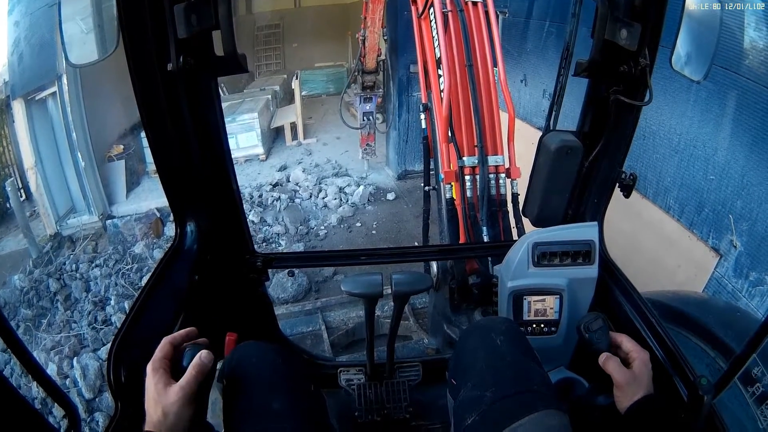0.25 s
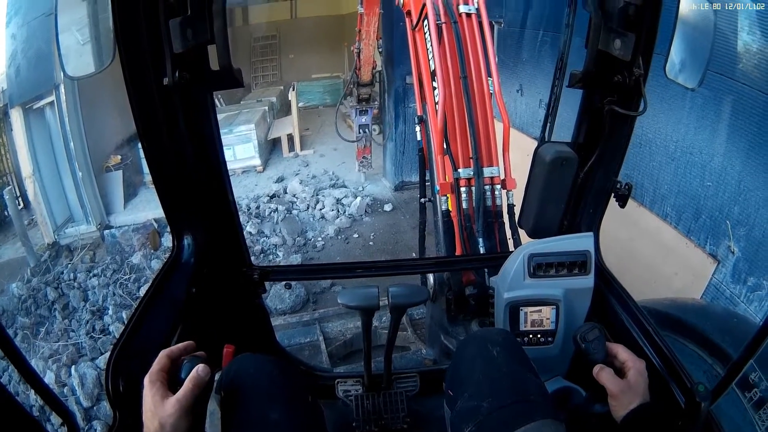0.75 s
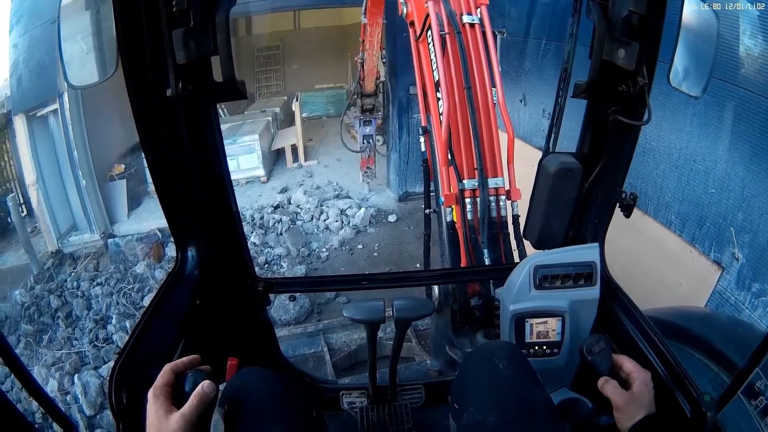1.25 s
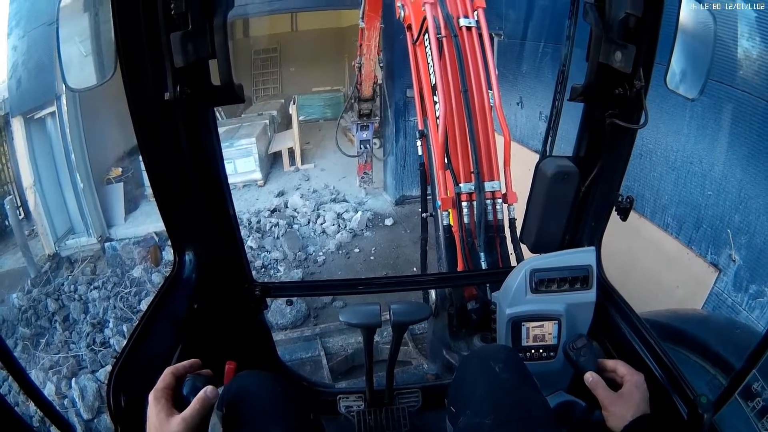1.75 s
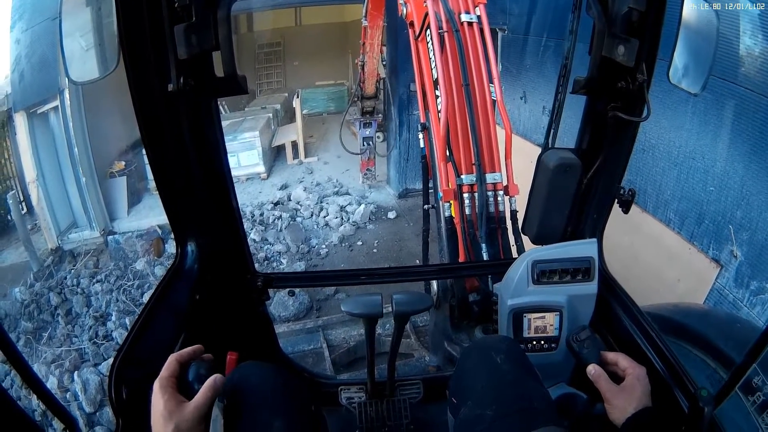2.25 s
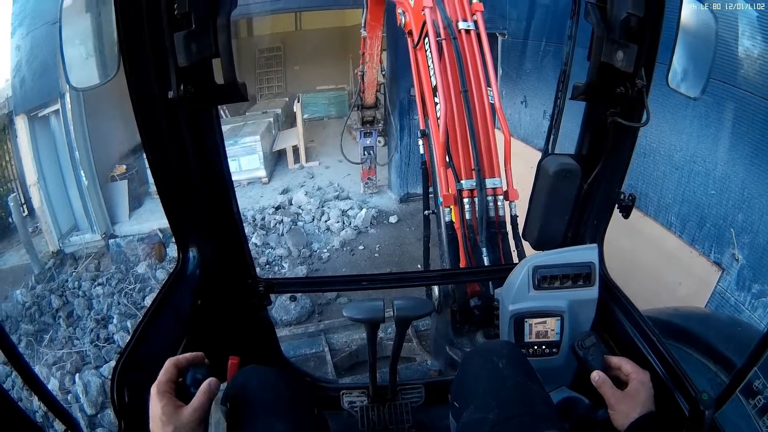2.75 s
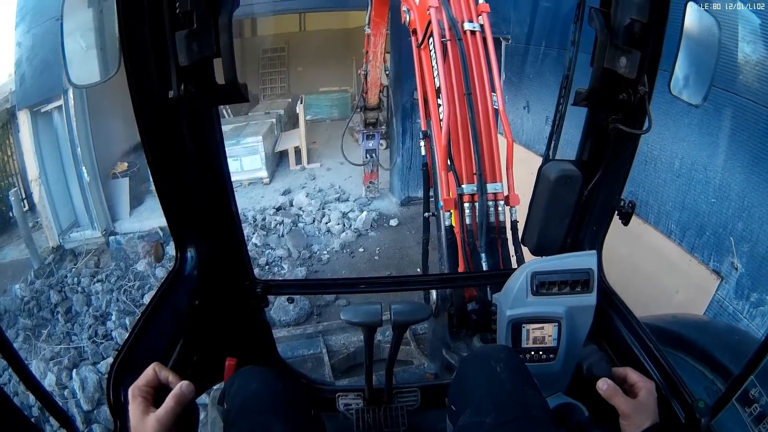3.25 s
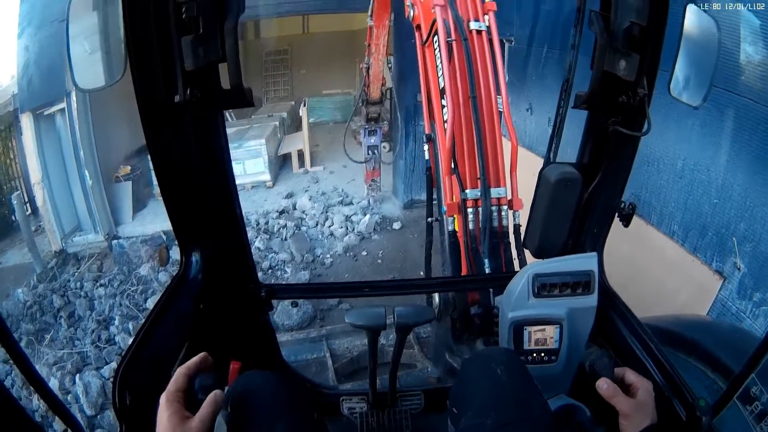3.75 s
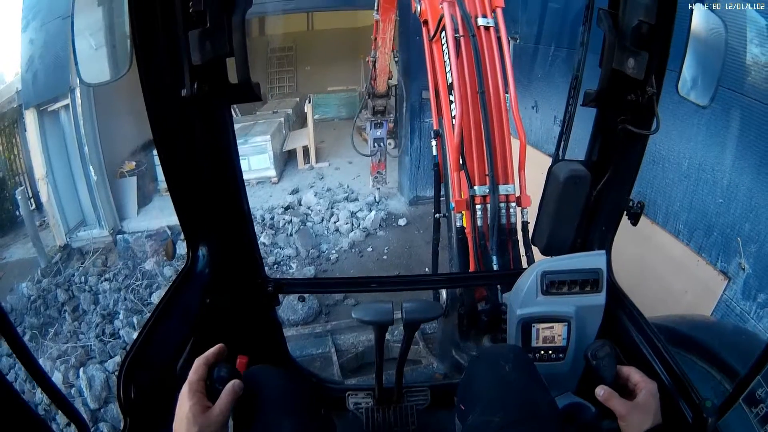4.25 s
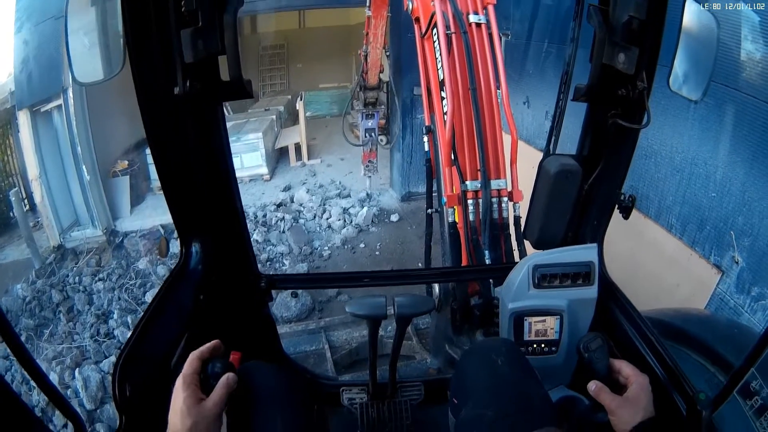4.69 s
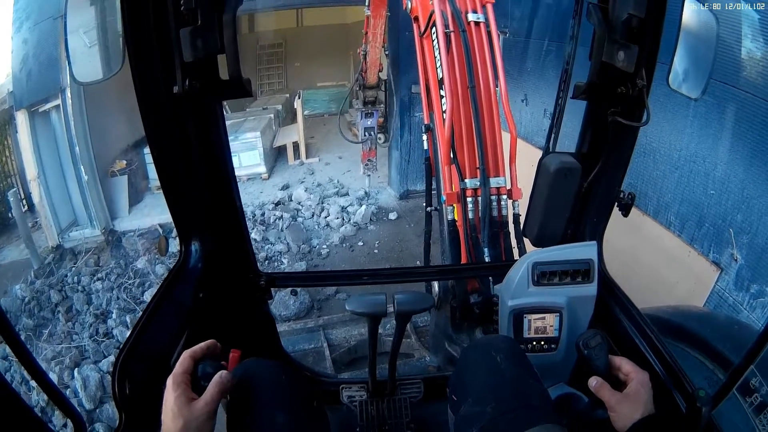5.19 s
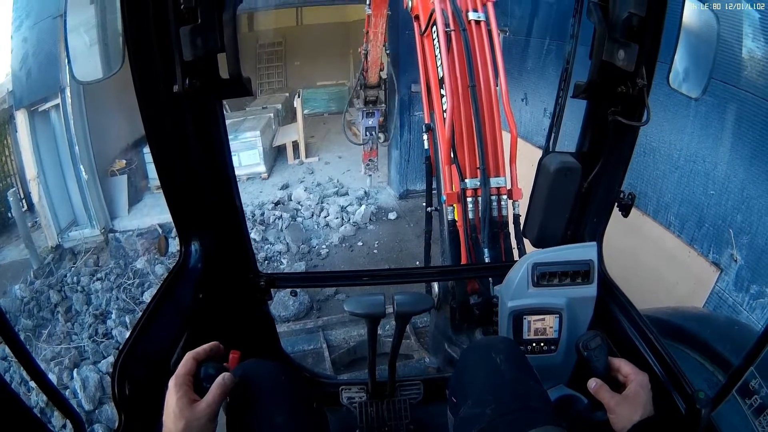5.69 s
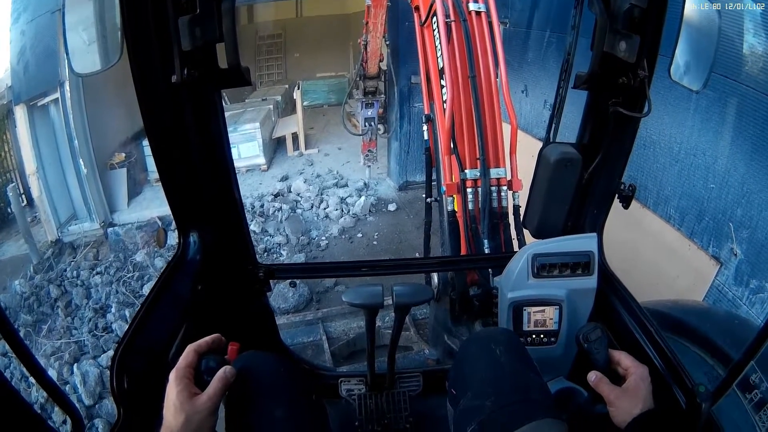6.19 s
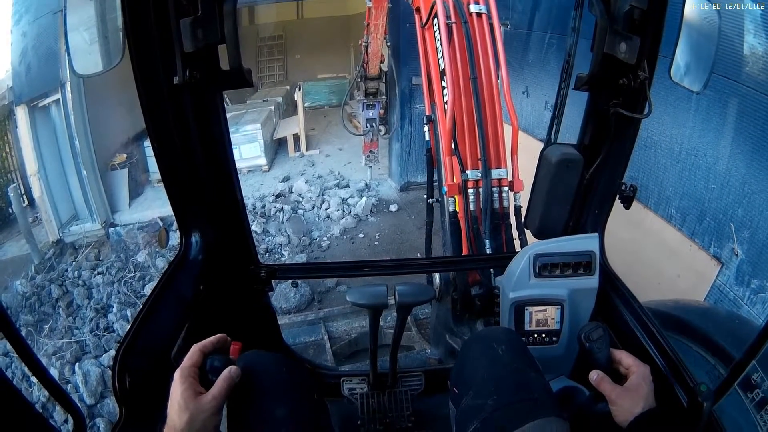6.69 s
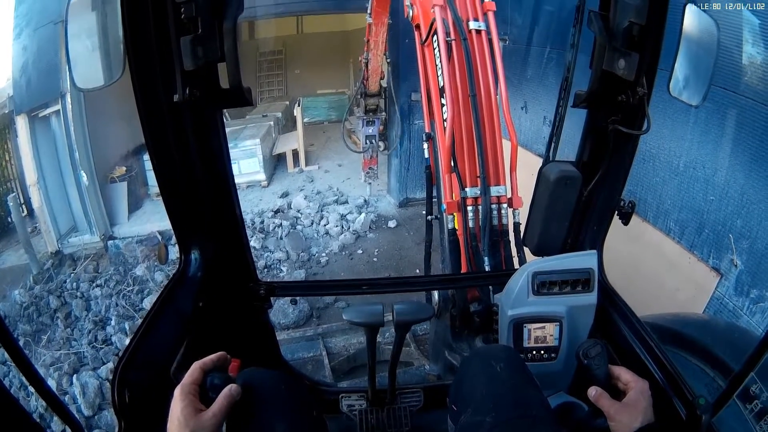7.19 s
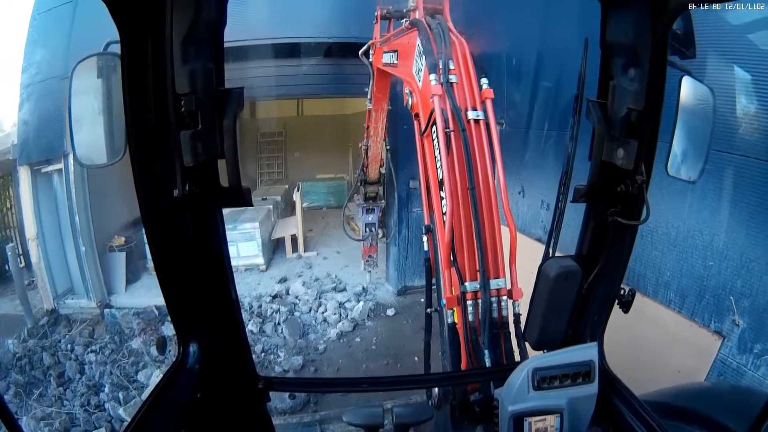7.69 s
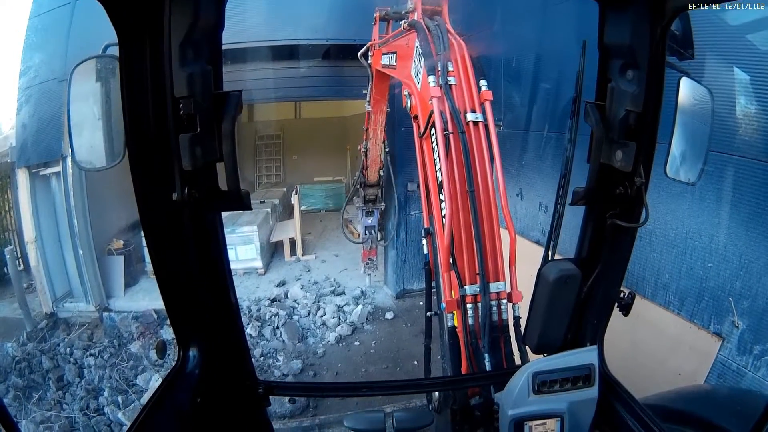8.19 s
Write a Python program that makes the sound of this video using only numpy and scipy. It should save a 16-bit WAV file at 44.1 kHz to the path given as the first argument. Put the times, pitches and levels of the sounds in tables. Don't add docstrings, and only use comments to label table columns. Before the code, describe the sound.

From the first instant a hydraulic breaker hammers concrete, heard inside the cab of a small diesel excavator. From 0 to 5 seconds the tool sits loosely: roughly sixteen to eighteen knocks a second, uneven in strength, some nearly missing, with rattling steel, chip clatter, bright oil spits and faint thin squeals. Deep cab sway around 35 hertz lurches hard, clipping the microphone, especially in the first 0.2 seconds and around 0.85-1.15. Grinding swells near 2.7, with low groans there and around 3.5. At about 5 seconds the chisel seats; blows lock to a steady fifteen per second, with fuller, drumming thuds through floor and seat, rapping window glass and regular rattle bursts. From about 7.2 the tone shifts slightly as the listener leans back. Engine and pump drone stays constant beneath, and the hammering continues to the cut at 8.4.

```python
import sys
import numpy as np
from scipy import signal
from scipy.fft import rfft, irfft, next_fast_len
from scipy.io import wavfile
from scipy.ndimage import uniform_filter1d, minimum_filter1d

SR = 44100
rng = np.random.default_rng(int(sys.argv[2]) if len(sys.argv) > 2 else 0)


def ratio(d):
    e = np.asarray(d, float) / 20
    return 10 ** e


def wav_record(signal):
    frames = np.transpose(np.atleast_2d(signal))
    bounded = np.clip(frames, -1, 1)
    quanta = np.round(bounded * 32767).astype(np.int16)
    wavfile.write(sys.argv[1], SR, quanta)


N = 372204

# (time [s], strokes made so far [count])
STROKES = [(.022, 0), (.196, 3), (.447, 7), (.613, 10), (1.142, 19), (1.46, 24), (1.92, 31), (2.086, 34),
           (2.69, 46), (3.053, 53), (3.495, 60), (3.605, 62), (4.01, 70), (4.225, 74), (4.344, 76),
           (4.966, 85), (8.416, 136)]
# (time [s], knock level [dB])
BITE = [(0, -27.5), (.32, -30), (.55, -35), (.67, -27), (.9, -31), (1.05, -17.5), (1.2, -34), (1.35, -21.5),
        (1.75, -25.5), (2.1, -29), (2.4, -24.5), (2.75, -23), (3.1, -36), (3.3, -24.5), (3.7, -27),
        (4.0, -34), (4.25, -25), (4.9, -22)]
# (time [s], knock loss [dB], rattle gain [dB])
SKIDS = [(0.196, 11, -7), (0.259, 2, 2), (0.322, -9, -2), (0.384, 4, 7.5), (0.502, 2, 4), (0.558, -9, 1),
         (0.613, -5, 6), (0.789, -2, 0), (0.848, 16, 10), (0.966, 6, 2), (1.024, 1.5, -0.5),
         (1.083, 3, 5.5), (1.269, 2, 7.5), (1.46, 24, -16), (1.526, -1.5, 6.5), (1.591, -4.5, -0.0),
         (1.657, -3, -0.5), (1.723, -3.5, 1), (1.789, -8, -2), (1.854, -3, -3), (1.92, -4, 7.5),
         (1.975, -3, 10), (2.086, 22.0, -5), (2.136, -1, -5), (2.187, 11, -7), (2.237, -1.5, -1),
         (2.287, 1.5, 2), (2.388, 2, 1), (2.438, 5, 3), (2.489, 4, 0), (2.589, 2, -25), (2.742, -1, -0.5),
         (2.794, -3.5, 7.5), (2.897, 4, 4), (3.001, -3, 4), (3.053, -9, -2.0), (3.242, -4, 6),
         (3.306, -1.5, 7), (3.369, 2.5, 9), (3.432, 16, -4), (3.495, 27, 4), (3.656, 6, -2.5),
         (3.706, -2, 4), (3.757, -4, -10), (3.808, -2, 3), (3.858, 3, -3), (3.909, 6, -16),
         (3.959, -3, -2.5), (4.064, 7.0, 7), (4.118, 13, -21), (4.171, 5, -18), (4.225, 5, -7),
         (4.284, 2, 8.5), (4.344, 14, -10), (4.413, 23, 0), (4.551, -4.5, 0), (4.69, 5, 1), (4.759, -1, 10),
         (4.897, 6, 0), (4.966, -1.5, -7)]
# (time [s], floor pan gain [dB], knock gain [dB], rattle gain [dB])
SEATED = [(5.034, 7, -1, 2), (5.101, 1, 0.5, 2), (5.169, -1, 2, 2.5), (5.237, 4.5, 1, 3),
          (5.304, -0.5, -6, -4.5), (5.372, 4, -2, -3), (5.44, 8, -3.5, -2), (5.507, 4.5, 0, 4),
          (5.575, 4, 1.5, 4), (5.642, 4, 1, 2), (5.71, 4, -2.5, -1), (5.778, 3, -2, -6), (5.845, 3, 1, 1),
          (5.913, 3.5, 3, 4.5), (5.981, 4, 1, 3.0), (6.048, 14, -10, 3.5), (6.116, 4.5, -2.5, -4),
          (6.184, 4, -0.5, -3), (6.251, 3, 2.5, 0), (6.319, 4, 3.5, 4), (6.387, -3, 3.5, 4),
          (6.454, 7, -2.0, -5), (6.522, 7, -5.5, -1.5), (6.59, 11, -2, 0.5), (6.657, 4, 2, 2),
          (6.725, 2, 5, 1), (6.792, -2, 2, -0.5), (6.86, 14, -8, -2.5), (6.928, -2, 0, -1),
          (6.995, 0, -0.5, 2), (7.063, 7, 0.5, 4), (7.131, 1, 4.5, 3.5), (7.198, 1, 0, 0),
          (7.266, 5.5, -2.5, -1), (7.334, 6.5, 0.5, 1), (7.401, 12.5, -3, 3), (7.469, -5.5, 2.5, 2.0),
          (7.537, 8, -0.5, 0), (7.604, -3, 0.5, -0.5), (7.672, 12.5, -4, -2.5), (7.74, 4, 0.5, 0),
          (7.807, 2, 3, 2.5), (7.875, 1.5, 4, 5.5), (7.942, 3.5, -0.5, 1.0), (8.01, 0, -2.5, -3),
          (8.078, -2, -1, -2), (8.145, -2.5, 1, 3), (8.213, 8, -3, -1), (8.281, 1, 1, 1.0),
          (8.348, -2, 2.5, -1)]
SEATED_GAIN_DB = 1
RATTLE_DB, RATTLE_FOLLOWS_GRIND = -44, 0.77
KNOCK_SCATTER_DB, RATTLE_SCATTER_DB = 1, 3.5


def blows(loose):
    pace_s, made = np.transpose(STROKES)
    blow_s = np.interp(np.arange(made[-1] + 1), made, pace_s)
    at = np.round(blow_s * SR).astype(int)
    slack = loose[at]
    chance = rng.standard_normal((len(at), 2))
    loss_db, catch_db = per_stroke(SKIDS, blow_s)
    pan_db, gain_db, shake_db = per_stroke(SEATED, blow_s)
    knock_db = in_time(BITE)[0][at] - loss_db + SEATED_GAIN_DB * (1 - slack) + gain_db
    knock_db = knock_db + KNOCK_SCATTER_DB * slack * chance[:, 0]
    grind_db = in_time(GRIND)[0]
    rattle_db = RATTLE_DB + shake_db + catch_db
    rattle_db = rattle_db + RATTLE_FOLLOWS_GRIND * slack * (grind_db[at] - grind_db[-1])
    rattle_db = rattle_db + RATTLE_SCATTER_DB * slack * chance[:, 1]
    return blow_s, knock_db, pan_db, rattle_db


# (frequency [Hz], level [dB], decay time T60 [s], arrival after the blow [ms])
PANELS = [(192, -5, 0.31, -9.5), (226, -10, 0.05, 3.5), (316, -0.5, 0.067, 6), (339.4, -0.5, 0.069, 6),
          (403, -10, 0.071, 3.5), (495, -9, 0.16, 6.5), (561, -4, 0.09, -2.5), (681, -2, 0.059, -2.5),
          (750, -1.5, 0.053, -2.5), (954.7, -3.5, 0.094, 1.5), (1040, -10.5, 0.043, 2)]
# (time after the blow [s], level [dB])
CONTACTS = [
    (0, -2.5),
    (.0042, -3.5),
    (.013, -8.5),
    (.033, -8.5),
]
RAPS_DB = [-8, -2, -2, 2, -4.0, -7, 1.0, 1, 2.5, 6.5, 6, 2, 1, -4, 5, 3, 1, -2, 3.5, 2, 4, -1, -2, 4.5, 1,
           2.5, -0.5, -1.0, 5, 0, -1, 0.5, 6.5, 1, 3, 2, -2, -2.0, 0, 0.5, 2, -2, -2, 4, 3, 3.5, 5, 0, 0,
           -4]
FLOOR_PAN_HZ, SEATED_FLOOR_DB, PAN_REBOUND_LOSS_DB = (300, 350), 9.5, 9
WINDOW_HZ, LEANED_WINDOW_DB, GLASS_HZ = (715, 800), 4, (650, 800)
THUD_HZ, THUD_WIDTH_HZ, THUD_AFTER_S, THUD_DB = 516, 200, 0.00492, 29


def knock(blow_s, knock_db, pan_db, loose):
    after, contact_db = np.transpose(CONTACTS)
    chance = rng.standard_normal((len(blow_s), len(PANELS), 2, len(after)))
    slack = loose[np.round(blow_s * SR).astype(int)][:, None]
    scatter = .22 + .78 * slack
    rap_db = np.r_[np.zeros(len(blow_s) - len(RAPS_DB) - 1), RAPS_DB, -4][:, None]
    floor_db = (SEATED_FLOOR_DB - PAN_REBOUND_LOSS_DB * (after > 0)) * (1 - slack) + pan_db[:, None]
    window_db = LEANED_WINDOW_DB * np.clip(blow_s[:, None] - LEAN_S + 1, 0, 1)
    thuds = spikes(blow_s + THUD_AFTER_S, (1 - slack[:, 0]) * ratio(knock_db + THUD_DB))
    out = resonance(thuds, THUD_HZ, THUD_WIDTH_HZ)
    for k, (hz, db, t60, arrival_ms) in enumerate(PANELS):
        db = db + floor_db * (FLOOR_PAN_HZ[0] < hz < FLOOR_PAN_HZ[1])
        db = db + window_db * (WINDOW_HZ[0] < hz < WINDOW_HZ[1])
        db = db + rap_db * (GLASS_HZ[0] < hz < GLASS_HZ[1])
        moments = blow_s[:, None] + after + arrival_ms / 1000 + .0008 * scatter * chance[:, 0, 0]
        heights_db = knock_db[:, None] + contact_db + db + (.6 + 2 * slack) * chance[:, k, 1]
        clicks = spikes(moments, ratio(heights_db))
        r, w = ratio(-60 / (t60 * SR)), 2 * np.pi * hz / SR
        out = out + (-1) ** k * signal.lfilter([0, np.sin(w)], [1, -2 * r * np.cos(w), r * r], clicks)
    return ratio(-1.5) * signal.sosfilt(signal.butter(2, 1500, fs=SR, output="sos"), out)


# (time [s], pitching frequency [Hz], pitching level [dB], bouncing level [dB])
SWAY = [(0, 34.4, -5.5, -23), (.26, 34.74, -16.5, -10.5), (.37, 34.87, -9, -14.5), (.82, 33.92, -7, -18.5),
        (.99, 34.8, -2.5, -16.5), (1.36, 34.9, -17.5, -18), (1.76, 39, -26, -14), (2.0, 32.9, -8, -15.5),
        (2.21, 29, -48, -27), (2.37, 31.46, -13.5, -16), (2.55, 32, -17, -21), (2.66, 37, -11, -19),
        (2.85, 37, -10, -24), (3.0, 37, -16, -24), (3.25, 32, -12, -22), (3.36, 33, -10.5, -16.5),
        (3.62, 34.18, -29, -17), (3.81, 34.13, -5, -35), (3.92, 34.36, -22, -25), (4.21, 37.1, -8, -11),
        (4.6, 39.5, -24, -16), (4.79, 39.63, -17, -13), (5.3, 38.8, -26, -14.5), (6, 38.8, -28, -17)]
# (time [s], level [dB])
HEAVE = [(0, -4), (.35, -22), (.45, -18), (.9, -24), (1.35, -10.5), (1.6, -18), (2.0, -11), (2.15, -10.5),
         (2.55, -8.5), (2.95, -28), (3.2, -19), (3.35, -8.5), (3.45, -21), (3.62, -10.5), (3.85, -22),
         (4.02, -14), (4.25, -9.5), (4.5, -17.5), (5.0, -17.5)]
# (frequency [Hz], width [Hz], level [dB])
BOOM = [(65.4, 9.5, 2), (74.6, 17.2, 1.5), (89.7, 6.2, 0.5), (96.6, 7.2, 3.5), (115, 9.6, 1),
        (127, 35, -28)]
# (time [s], length [s], gain [dB])
BOOM_SURGES = [(.02, .12, -7), (.3, .1, 11), (1.06, .06, 11), (2.47, .07, -7), (2.95, .05, -7),
               (.7, .16, 8), (1.35, .17, 3), (1.85, .2, 6), (2.25, .17, -6), (2.78, .1, 8), (3.1, .12, 6),
               (3.92, .12, 10), (4.65, .2, 6.5)]
# (time [s], frequency [Hz])
AIR = [(.2, 103.4), (.32, 98.3), (.55, 92.1), (.85, 99.2), (1.1, 91.9), (1.3, 100.3), (1.6, 92), (1.9, 104),
       (2.7, 103.4), (2.85, 95), (3.1, 95.7), (3.3, 118), (3.6, 105), (3.9, 100.3), (4.0, 92.3), (4.5, 102),
       (5, 100)]
SURGE_LEAD = 0.273
BOUNCING_HZ, BOUNCING_WANDER_HZ, LURCH_DB = 46.5, 2, 2.5
BOOM_DB, AIR_DB, AIR_WANDER_HZ = -23, -30, 0.85


def sway(blow_s, loose):
    t = np.arange(N) / SR
    forced, free = np.sqrt(1 - loose), np.sqrt(loose)
    ends = np.r_[2 * blow_s[0] - blow_s[1], blow_s, 2 * blow_s[-1] - blow_s[-2]]
    cycle = uniform_filter1d(np.interp(t, ends, np.arange(len(ends))), 2000, mode="nearest")
    turn = 2 * np.pi * (cycle + SURGE_LEAD)

    pitching_hz, pitching_db, bouncing_db = in_time(SWAY)
    first = ratio(in_time(HEAVE)[0])
    second = ratio(pitching_db + LURCH_DB * loose * drift(9.8))
    third = ratio(bouncing_db)
    rocking_hz = [pitching_hz, BOUNCING_HZ + BOUNCING_WANDER_HZ * drift(2.98)]
    pitching, bouncing = np.sin(2 * np.pi * np.cumsum(rocking_hz, axis=1) / SR)
    out = first * np.cos(turn + 0.77 * loose * drift(6.9))
    out += second * (forced * np.cos(2 * turn) + free * pitching)
    out += third * (forced * np.cos(3 * turn + 0.064) + free * bouncing)

    surge_db = sum(db * np.exp(-((t - s) / length) ** 2) for s, length, db in BOOM_SURGES)
    upper = ratio(BOOM_DB - 0.71 * loose + np.minimum(surge_db, 0))
    orders = rms_one(sum(np.cos(order * turn + .9 * order ** 2) for order in range(4, 8)))
    drive = forced * orders + free * 12 * rng.standard_normal(N)
    boom = np.zeros(N)
    for hz, width, db in BOOM:
        boom += ratio(db) * resonance(resonance(drive, hz, 2 * width), hz, 2 * width)
    boom = signal.sosfilt(signal.butter(4, 128, fs=SR, output="sos"), boom)
    even = np.sqrt(uniform_filter1d(boom ** 2, 9000))

    air_hz = in_time(AIR)[0] + AIR_WANDER_HZ * drift(2.4)
    air_level = loose * ratio(AIR_DB + surge_db + 1.7 * drift(8.8))
    out += air_level * np.sin(2 * np.pi * np.cumsum(air_hz) / SR)
    return np.sqrt(2) * out + upper * boom / even


def reined_in(motion):
    travel, hold = .66, int(.06 * SR)
    peak = uniform_filter1d(-minimum_filter1d(-np.abs(motion), hold), hold // 2)
    return motion * np.minimum(1, travel / peak)


# (time of the crest [s], height [full scale], length [s])
LURCHES = [(.074, .95, .022), (.015, .7, .02), (.046, .55, .012), (.105, .71, .012), (.131, .88, .016),
           (.16, .5, .012), (.847, .9, .02), (.903, .77, .015), (.959, .8, .016), (1.017, .82, .016),
           (1.048, .72, .016), (1.076, .7, .016), (1.134, .8, .012), (1.28, -.88, .012), (1.45, .9, .012),
           (1.607, -.8, .01), (1.977, .74, .012), (2.356, -.84, .014), (2.446, -.8, .014),
           (2.66, -.8, .012), (3.383, -.8, .024), (3.805, .74, .014), (4.107, .78, .01), (4.262, .92, .022)]
LURCH_HZ = 33


def lurched(motion):
    t = np.arange(N) / SR
    for s, height, length in LURCHES:
        share = np.exp(-((t - s) / length) ** 4)
        motion = (1 - share) * motion + share * height * np.cos(2 * np.pi * LURCH_HZ * (t - s))
    return motion


# (frequency [Hz], spectral density [dB per Hz])
ROAR = [(590, -9), (1000, -3), (1110, -1), (1230, -22), (1740, -9), (2210, -12), (2560, -20.5), (3300, -34),
        (4290, -29), (7260, -120)]


def roar(blow_s, knock_db):
    level = swell(blow_s + 0.0034, knock_db, 0.0036, 0.026)
    level = level + swell(blow_s + 0.0306, knock_db - 2.5, 0.0017, 0.0051)
    return ratio(-9.0) * level * ratio(1.2 * drift(67)) * coloured(rng.standard_normal(N), ROAR)


# (frequency [Hz], spectral density [dB per Hz])
RATTLE = [(760, -4.5), (1300, -4), (1890, -0.5), (2950, -9), (3370, -14.5), (5600, -10), (6280, -13.5),
          (7110, -9.5), (8130, -15.5), (11700, -12.5), (14100, -24), (15400, -39)]
# (frequency [Hz], width [Hz], level [dB])
STEEL = [(2950, 46, -2), (4100, 41, -4), (4750, 59, -0.5), (5280, 590, -6.5), (5710, 130, -1.5),
         (6980, 83, 3.5), (7530, 410, -6), (8840, 480, 0.5), (10300, 330, -10), (11900, 680, -2.5)]
# (time [s], peak level [dB])
CLATTER = [(0.0895, -24.5), (0.145, -29.5), (0.2808, -31), (0.4534, -26), (0.6589, -29), (0.6814, -31),
           (0.924, -30.5), (0.9805, -28.5), (1.029, -23.5), (1.998, -27), (2.281, -37), (2.3817, -31),
           (2.4776, -28), (2.553, -25), (2.6864, -34), (2.7956, -38), (2.8675, -28.5), (2.9764, -46),
           (3.05, -25.5), (3.1062, -29), (3.4148, -25.5), (3.5817, -33), (3.6138, -30.5), (3.7436, -27),
           (3.8451, -24.5), (3.891, -27.5), (4.2175, -34), (4.3231, -30), (4.527, -26), (4.793, -23.5)]
# (time [s], level [dB])
GRIND = [(0, -42), (.2, -51), (.85, -54), (1.2, -56.5), (1.7, -51.5), (2.15, -54), (2.4, -67), (2.7, -37.5),
         (2.95, -46), (3.12, -62), (3.35, -56), (3.7, -55.5), (3.85, -46.5), (4.05, -50), (4.4, -54),
         (4.8, -50), (5.1, -52), (8.44, -49)]
# (time [s], depth [dB])
HUSHES = [(.26, 11), (.315, 13), (.53, 13), (.78, 6), (1.18, 9), (0.879, 3), (1.46, 1), (2.17, 8),
          (3.09, 3), (3.16, 6), (3.299, 6), (3.475, 9), (3.56, 14), (3.67, 14), (3.72, 1), (4.1, 3),
          (4.42, 2)]
HUSH_S = 0.015
BOUNCE_S, BOUNCE_DB, BOUNCE_SCATTER_DB = 0.042, -25, 2
VALVE_AFTER_S, VALVE_DB = .022, -32
DUST_HZ, DUST_DB = 11900, -35


def rattle(blow_s, rattle_db, loose):
    clatter_s, clatter_db = np.transpose(CLATTER)
    chance = rng.standard_normal((len(blow_s), 2))
    scatter_db = BOUNCE_SCATTER_DB * chance[:, 1]
    level = swell(blow_s + .001, rattle_db + 1.5, .006, .016) + swell(blow_s + .021, rattle_db - 2.5, .0015, .014)
    bounce_s = blow_s + BOUNCE_S + 0.014 * chance[:, 0]
    bounce = loose ** 2 * swell(bounce_s, BOUNCE_DB - 14.5 + scatter_db, 0.004, 0.011)
    level = level * ratio(2.5 - 3.9 * loose) + bounce
    level = level + swell(clatter_s, clatter_db - 8.5, 0.00085, 0.024) + ratio(in_time(GRIND)[0])
    hush_db = sum(db * np.exp(-((np.arange(N) / SR - s) / HUSH_S) ** 2) for s, db in HUSHES)
    level = level * ratio(-hush_db)

    sizes = ratio(np.minimum(rng.exponential(1, N), 5)) * rng.choice([-1, 1], N)
    ticks = rms_one(sizes * (rng.random(N) < 5000 / SR))
    ticks = ticks * ratio(1.33 * drift(79)) * level
    ringing = sum(ratio(db) * resonance(ticks, hz, width) for hz, width, db in STEEL)
    steel = ratio(2.0) * np.std(ticks) * coloured(ticks + ringing, RATTLE)

    valve_s = blow_s + VALVE_AFTER_S + 0.0012 * chance[:, 0]
    valve = swell(valve_s, VALVE_DB + scatter_db, 0.00065, 0.0038) * rng.standard_normal(N)
    valve = resonance(resonance(valve, 10500, 3300), 11800, 3300)
    dust = ratio(DUST_DB) * loose * resonance(ticks, DUST_HZ, 1600)
    return steel + valve + dust


# (time [s], peak level [dB])
SPITS = [(0.0383, -32), (0.068, -24), (0.1476, -22), (0.388, -40), (0.4633, -31), (0.6584, -34),
         (0.7562, -35), (0.854, -32), (0.9812, -31), (1.0321, -24), (1.1717, -36), (1.488, -33),
         (1.886, -34), (2.0004, -26), (2.093, -37), (2.3805, -42), (2.4783, -35), (2.5321, -29),
         (2.556, -23), (2.6366, -30), (2.7676, -21), (2.807, -17), (2.9224, -21), (2.9754, -25),
         (3.1057, -39), (3.1363, -40), (3.273, -31), (3.3316, -32), (3.3648, -39), (3.3922, -31),
         (3.497, -38), (3.5244, -30), (3.5818, -34), (3.6152, -26), (3.686, -33), (3.706, -31),
         (3.7426, -39), (3.7953, -28), (3.8249, -29), (4.0297, -32), (4.1425, -37), (4.2218, -39),
         (4.582, -29), (4.7202, -33), (4.7965, -31)]


def spits():
    s, db = np.transpose(SPITS)
    spit = resonance(swell(s, db + 2.5, .0006, 0.0045) * rng.standard_normal(N), 10200, 5000)
    return resonance(spit, 10200, 5000)


# (start [s], end [s], frequency [Hz], level [dB])
WHISTLES = [(3.8, 3.95, 4660, -56), (.23, .4, 8037, -53), (.03, .1, 2866, -53), (.28, .47, 2865, -54),
            (.55, .68, 2860, -56), (.72, .96, 2862, -51.5), (0, .22, 3048, -57), (.33, .43, 3048, -55),
            (.77, .92, 3055, -58), (.18, .23, 5190, -57), (.26, .36, 5190, -58), (.55, .66, 5180, -56),
            (.55, .72, 5419, -58), (.88, .98, 5425, -54), (.36, .48, 5795, -58), (2.62, 3.05, 6970, -54),
            (3.55, 4.25, 197, -36), (.5, .62, 8037, -63), (2.6, 2.95, 1055, -43), (2.5, 2.85, 126, -31)]
# (start [s], end [s], frequency [Hz], level [dB])
GROANS = [(3.45, 3.7, 216, -36), (2.6, 2.75, 214, -38), (1.02, 1.2, 195, -36)]


def whistles(rows):
    out = np.zeros(N)
    for start, end, hz, db in rows:
        at = np.arange(int(start * SR), int(end * SR))
        hiss = rng.standard_normal(len(at) + 8000)
        hiss = resonance(resonance(hiss, hz, 14), hz, 14)[8000:]
        edges = np.clip(np.minimum(at / SR - start, end - at / SR) / 0.025, 0, 1)
        out[at] += ratio(db + 1) * edges * ratio(2 * drift(25)[at]) * rms_one(hiss)
    return out


# (multiple of crank rate, level [dB])
ORDERS_DB = [(3, -44), (4, -50), (4.5, -48), (9, -39), (10.5, -47), (12, -46), (14.5, -46), (18, -47),
             (27, -50), (44, -57)]
# (frequency [Hz], spectral density [dB per Hz])
DRONE = [(74, -16.5), (125, -3.5), (247, -9.5), (335, -3.5), (423, -8), (860, -15), (980, -15), (1080, -14),
         (1220, -30), (1880, -22.5), (3270, -39.5), (4000, -43.5), (5200, -36), (6500, -50), (12000, -55),
         (15500, -70)]
# (time [s], gain [dB])
LOAD = [(0, 3), (1.9, 1.5), (2.1, -0.5), (2.45, 1.5), (2.65, 3), (3.3, 2), (3.6, 0), (3.9, 3), (5., 2.5),
        (8.44, 2)]
ENGINE_HZ, DRONE_DB = 38.31, -28.5


def engine():
    turn = 2 * np.pi * ENGINE_HZ * np.arange(N) / SR + 0.04 * drift(0.8)
    lines = np.zeros(N)
    for order, db in ORDERS_DB:
        lines += ratio(db + 2.5 * drift(5.0)) * np.sqrt(2) * np.sin(order * turn + order ** 2)
    throb = ratio(1.5 * np.cos(1.5 * turn) + 1.5 * drift(6))
    level = ratio(DRONE_DB - 2.0 + in_time(LOAD)[0])
    return lines + level * throb * coloured(rng.standard_normal(N), DRONE)


def per_stroke(rows, blow_s):
    s, *columns = np.transpose(rows)
    falls_on = np.abs(blow_s[:, None] - s) < .02
    return np.transpose(falls_on @ np.transpose(columns))


def in_time(rows):
    s, *columns = np.transpose(rows)
    return [np.interp(np.arange(N) / SR, s, c) for c in columns]


def spikes(seconds, heights):
    at = np.round(np.maximum(seconds, 0) * SR).astype(int).ravel()
    return np.bincount(at, np.ravel(heights), 2 * N)[:N] + 1e-18


def swell(seconds, db, rise_s, fall_s):
    up, down = np.exp(-1 / (rise_s * SR)), np.exp(-1 / (fall_s * SR))
    return signal.lfilter([1 - up], np.polymul([1, -up], [1, -down]), spikes(seconds, ratio(db)))


def resonance(x, hz, width_hz):
    r = np.exp(-np.pi * width_hz / SR)
    zeros = np.array([1, 0, -1]) * (1 - r * r) / 2
    return signal.lfilter(zeros, [1, -2 * r * np.cos(2 * np.pi * hz / SR), r * r], x)


def rms_one(x):
    return x / np.sqrt(np.mean(x ** 2) + 1e-20)


def coloured(x, spectrum):
    size = next_fast_len(N)
    hz, db = np.transpose(spectrum)
    log_hz = np.log(np.arange(size // 2 + 1) * SR / size + 1)
    gain = ratio(np.interp(log_hz, np.log(hz), db))
    return rms_one(irfft(rfft(x, size) * gain, size)[:N])


def drift(rate_hz):
    slow = rng.standard_normal(N // 40 + 4002)
    r = np.exp(-80 * np.pi * rate_hz / SR)
    slow = signal.lfilter([1], [1, -2 * r, r * r], slow)[4000:]
    return np.interp(np.arange(N) / 40, np.arange(len(slow)), rms_one(slow))


# (time [s], share of the sway off the beat [0-1])
LOOSE = [
    (0, .9),
    (4.75, .9),
    (4.97, .08),
    (8.44, .08),
]
NULL_HZ, LEANED_NULL_HZ, NULL_WIDTH_HZ, LEAN_S = 1220, 1083, 80, 7.23


def scene():
    loose, = in_time(LOOSE)
    blow_s, knock_db, pan_db, rattle_db = blows(loose)
    inside = knock(blow_s, knock_db, pan_db, loose) + roar(blow_s, knock_db)
    inside = inside + rattle(blow_s, rattle_db, loose) + spits() + whistles(WHISTLES) + engine()
    leaned = np.clip(np.arange(N) / SR - LEAN_S, 0, .8)
    upper_null = 1.32 * resonance(inside, NULL_HZ, NULL_WIDTH_HZ)
    inside = inside - upper_null - leaned * resonance(inside - upper_null * 0, LEANED_NULL_HZ, 124)
    motion = lurched(reined_in(sway(blow_s, loose)))
    return (inside + motion + whistles(GROANS))[None]


def low_pass(x):
    return signal.sosfilt(signal.butter(12, 15600, fs=SR, output="sos"), x)


def record(dry):
    ceiling = .705
    mix = np.clip(dry, -ceiling, ceiling)
    return low_pass(mix)


dry = scene()
out = record(dry)
wav_record(out)
```